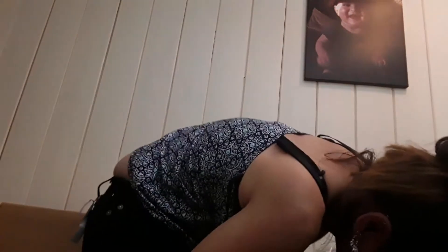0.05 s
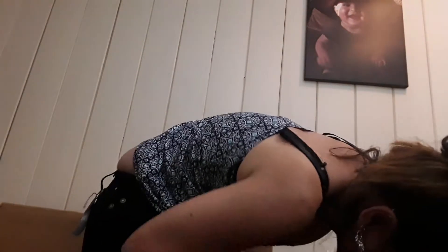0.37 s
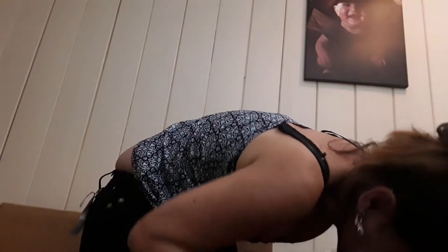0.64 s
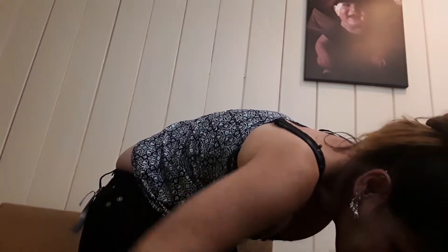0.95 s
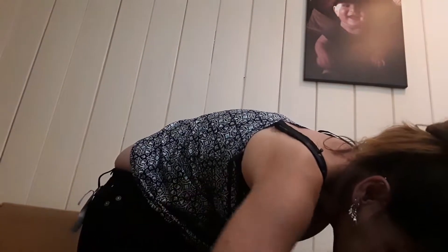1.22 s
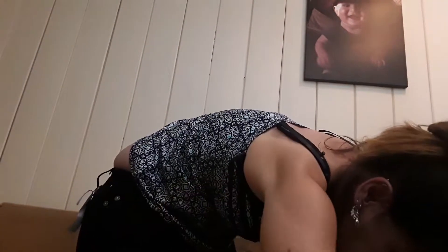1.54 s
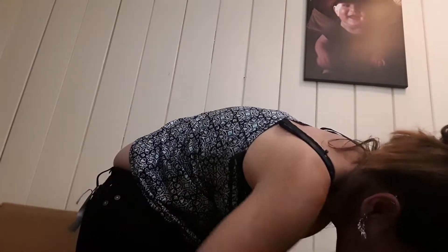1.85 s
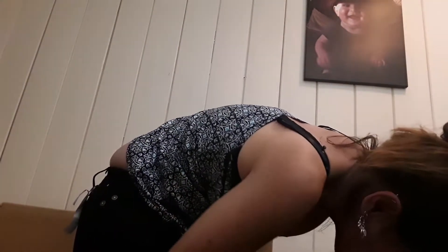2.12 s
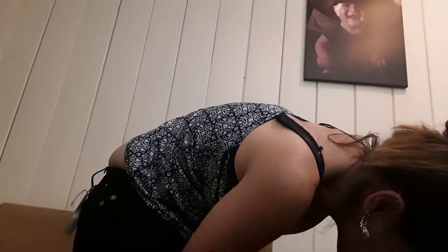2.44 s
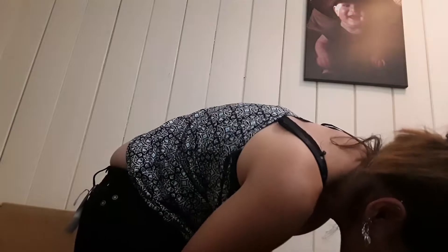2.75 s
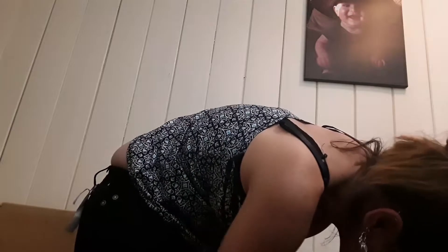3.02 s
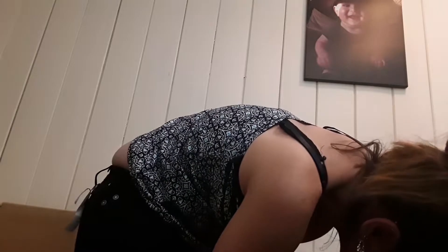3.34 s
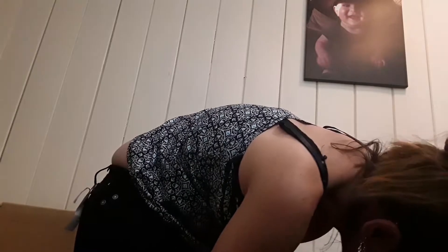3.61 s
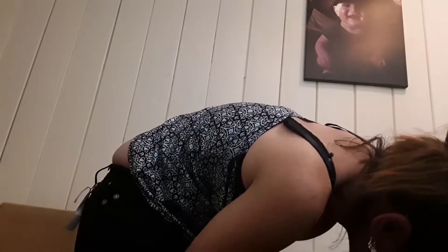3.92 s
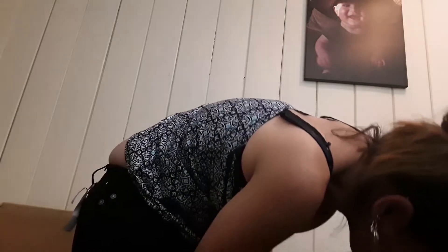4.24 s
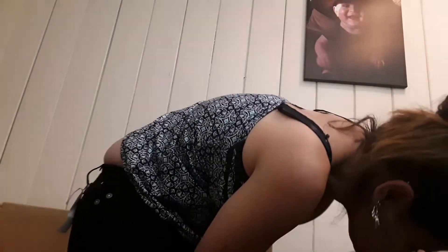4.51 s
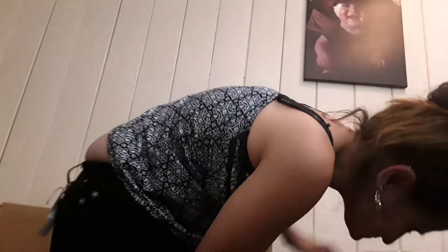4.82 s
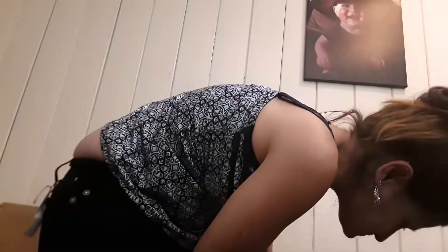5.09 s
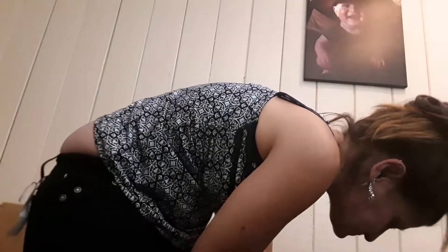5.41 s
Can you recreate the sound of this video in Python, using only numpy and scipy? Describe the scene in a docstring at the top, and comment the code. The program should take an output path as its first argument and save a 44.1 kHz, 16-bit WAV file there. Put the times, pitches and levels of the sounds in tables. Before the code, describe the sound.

Packing material crinkles and rustles inside a cardboard box, with sharp little snaps, light scraping and a few hollow bumps.

```python
"""A small panelled room: hands rummage through packing material in a cardboard box.
Creases buckle in showers of tiny clicks and some sharp snaps. The sheets rub on each other
and scrape along the cardboard, whose walls drone. The half-open box colours all of this
and rings when bumped now and then. Faint room noise lies underneath."""
import sys
import numpy as np
from scipy import signal
from scipy.fft import rfft, irfft, next_fast_len
from scipy.io import wavfile
from scipy.ndimage import uniform_filter1d

SR = 44100
rng = np.random.default_rng(int(sys.argv[2]) if len(sys.argv) > 2 else 0)


def wav_out(sig):
    """Save sig, one row per channel (or a flat mono array), as 16-bit PCM at SR to the path in sys.argv[1]."""
    wavfile.write(sys.argv[1], SR, np.round(np.clip(np.atleast_2d(sig).T, -1, 1) * 32767).astype(np.int16))


N = 249606
TIME = np.arange(N) / SR
FINE_T60_S = 0.006

# spectra of creases, finest creases and scraped cardboard: (frequency [Hz], relative density [dB])
CRINKLE = [(700, -39), (1300, -3), (2000, -4), (2600, -5), (3500, 0.3), (4500, 3.5), (5700, -2.5),
           (6700, 0), (8500, -9.5), (10500, -12.5), (15000, -55)]
CRISP = [(6000, -18), (8500, 5.5), (10000, -0.5), (12800, 4), (15000, -9.5), (16000, -23)]
SCRAPE = [(50, -21), (100, -15.5), (135, -9.5), (175, -6), (220, -3.5), (270, -4.5), (500, -3), (750, -2),
          (1200, 2.5), (1600, -6.5), (2400, -4), (5000, -27)]


def packing(crinkle_db, treble_db):
    """Creases buckle, the finest tick in the top treble, sliding sheets hiss underneath."""
    creases = crackle(crinkle_db, CRINKLE, 1760, 9100, peak_per_s=1500, spread_db=4.5, facets=20,
                      ring_db=11.5, width_oct=0.15, t60_s=0.01, near_db=-8.5, room_db=-21)
    fine = crackle(treble_db, CRISP, 6530, 15500, peak_per_s=900, spread_db=2.5, facets=8,
                   ring_db=16, width_oct=0.1, t60_s=FINE_T60_S, near_db=-30, room_db=-30)
    sliding = from_db(crinkle_db - 3.5) * noise(CRINKLE, N) + from_db(treble_db - 4.5) * noise(CRISP, N)
    return from_db(0.54) * creases + from_db(-0.1) * fine + sliding


def crackle(level_db, spectrum, low_hz, high_hz, peak_per_s, spread_db, facets, **facet_settings):
    """Random uneven clicks, dealt to facets of different pitch; harder handling makes more."""
    rate_per_s = peak_per_s * from_db(0.5 * (level_db - level_db.max()))
    sizes = from_db(spread_db * np.minimum(rng.exponential(1, N), 4)) * rng.choice([-1, 1], N)
    clicks = sizes * (rng.random(N) < rate_per_s / SR)
    # the hands set the power, however it is split among the clicks
    local_power = uniform_filter1d(uniform_filter1d(clicks ** 2, size=1500), size=1500)
    clicks = clicks / np.sqrt(np.abs(local_power) + 1e-4) * from_db(level_db)
    dealt_to = rng.integers(0, facets, N)
    out = np.zeros((2, N))
    for k, hz in enumerate(np.geomspace(low_hz, high_hz, facets)):
        response = facet(spectrum, hz, **facet_settings)
        out += signal.oaconvolve((clicks * (dealt_to == k))[None], response, axes=1)[:, :N]
    return out


def facet(spectrum, ring_hz, ring_db, width_oct, t60_s, near_db, room_db):
    """A patch of sheet flips: a brief ring, then duller reflections from box and room; energy 1."""
    buckle_s = 0.00079  # run along the crease, before the decay
    near_t60_s, room_t60_s, room_rise_s, dull_hz = 0.11, 0.23, 0.0068, 9150
    t = TIME[:10000]
    tone = noise(spectrum, len(t), ring_hz, ring_db, width_oct)
    flip = tone * from_db(-60 * np.maximum(t - buckle_s, 0) / t60_s)
    near = from_db(near_db - 60 * t / near_t60_s)
    room = from_db(room_db - 60 * t / room_t60_s) * (1 - np.exp(-t / room_rise_s))
    echoes = tone[:, ::-1] * np.hypot(near, room)  # same colour, unrelated waveform
    dull_echoes = signal.lfilter(*signal.butter(1, dull_hz, fs=SR), echoes)
    return rms_one(flip + dull_echoes) / np.sqrt(len(t))


def handling():
    """Crinkle, scrape and top treble levels [dB]; overlapping hand strokes add in power."""
    # (start [s], rise [s], hold [s], crinkle [dB], scrape [dB re crinkle], treble [dB re crinkle])
    strokes = [(0.0, 0.0013, 0.026, -38, -4.5, -9.5), (0.03, 0.047, 0.19, -45.5, -4.5, -10.5),
               (0.255, 0.014, 0.052, -43.5, -5.0, -10.5), (0.353, 0.054, 0.19, -54.5, -1, -9.5),
               (0.647, 0.03, 0.064, -53, -8.5, -21), (0.732, 0.044, 0.27, -49.5, -3.0, -3),
               (1.18, 0.015, 0.13, -70, -5.5, -16), (1.486, 0.068, 0.013, -29.0, -8.5, -10.0),
               (1.628, 0.015, 0.019, -41, -6.5, -9), (1.71, 0.036, 0.06, -50, -4.5, -10),
               (1.797, 0.029, 0.21, -36.5, -7.5, -5.5), (2.084, 0.056, 0.043, -47.5, -7.0, -12),
               (2.223, 0.061, 0.008, -47.5, -7, -9.5), (2.274, 0.047, 0.03, -39.0, -7.0, -7.5),
               (2.6, 0.049, 0.014, -42.5, -4.5, -15), (2.689, 0.0098, 0.0082, -45.0, -3, -14.0),
               (2.727, 0.014, 0.1, -49.0, -5, -10.5), (2.877, 0.032, 0.058, -46, -9, -11),
               (2.97, 0.035, 0.02, -43.5, -5.5, -9), (3.152, 0.1, 0.046, -45, -8, -14),
               (3.483, 0.031, 0.005, -44.5, -11.5, -12.5), (3.52, 0.025, 0.025, -33.5, -8.0, -5.5),
               (3.601, 0.018, 0.067, -37.5, -8.5, -4.5), (3.723, 0.057, 0.012, -40.5, -7, -4),
               (3.862, 0.033, 0.05, -45.5, -11, -5), (3.888, 0.041, 0.12, -43.0, -8.5, -7.5),
               (4.087, 0.035, 0.17, -55, -8, -10.0), (4.317, 0.023, 0.12, -50.5, -11.5, -11),
               (4.447, 0.0055, 0.036, -45, -4.5, -6), (4.482, 0.046, 0.1, -40, -5, -6.5),
               (4.645, 0.063, 0.03, -38, -6.0, -7), (4.751, 0.069, 0.1, -46, -5.5, -7.5),
               (4.968, 0.028, 0.22, -45, -7.5, -11), (5.118, 0.076, 0.2, -39, -7.5, -11),
               (5.387, 0.036, 0.18, -43.5, -6.0, -14), (5.55, 0.035, 0.083, -42.5, -8, -6)]
    # creep of the packing at rest: (crinkle [dB], scrape [dB], treble [dB])
    rest_db = (-70.5, -82, -83)
    power = from_db(rest_db)[:, None] ** 2
    for start_s, rise_s, hold_s, crinkle_db, scrape_db, treble_db in strokes:
        gain = stroke(start_s, rise_s, hold_s, crinkle_db)
        power = power + np.outer(from_db([0, scrape_db, treble_db]), gain) ** 2
    return 10 * np.log10(power)


def stroke(start_s, rise_s, hold_s, level_db):
    """Gain of one movement: builds up, holds, settles once the hands let go."""
    settle_db_per_s = 188
    grip = np.clip((TIME - start_s) / rise_s, 0, 1) ** 0.68
    released_s = np.maximum(TIME - start_s - rise_s - hold_s, 0)
    return grip * from_db(level_db - settle_db_per_s * released_s)


def snaps():
    """Stiff creases give way at once: a bright crack and a ring at the crease's own pitch."""
    # (time [s], energy [dB], ring [Hz], crack [dB re ring])
    stiff_creases = [(0.144, -14.5, 4300, -2), (0.2631, -8, 4830, -7.5), (0.2706, -14, 3830, -8),
                     (0.4048, -23, 4050, -23), (0.564, -13, 4300, -13.5), (0.5695, -17.5, 5360, -13),
                     (0.9831, -10, 4890, -11), (1.23, -24.5, 4860, -26), (1.2926, -26.5, 4450, -32),
                     (1.4898, -15, 4400, -24), (1.5556, -1, 4400, -14), (1.64, -9, 5070, -9),
                     (1.7972, -11.5, 4090, -10), (1.8145, -8.5, 4430, -4), (1.8283, -6.5, 4560, 0),
                     (1.873, -8, 6540, -10), (1.8885, -4, 4330, -13), (1.9892, -9, 4640, -2),
                     (2.0083, -13, 4880, -4), (2.0272, -4, 6150, -1), (2.1427, -14.5, 4350, -12.5),
                     (2.1653, -10.5, 4480, -13), (2.2298, -19, 6590, -10), (2.6299, -21, 1950, -21),
                     (2.6526, -6.5, 4380, -18), (2.8065, -17.5, 4940, -4), (2.892, -19.0, 5050, -23),
                     (2.968, -7, 4430, -9), (3.0281, -13.5, 4800, -3.5), (3.0766, -22.5, 4710, -22),
                     (3.1855, -19.5, 4870, -24), (3.2958, -13.5, 4630, -24), (3.3163, -17, 4710, -9),
                     (3.52, -8.5, 4420, -19), (3.54, -9.5, 2000, -13), (3.76, -12.5, 7770, -2),
                     (3.7828, -9, 3790, -7), (3.8572, -14.5, 4100, -9), (3.9263, -12.5, 5000, 1),
                     (3.933, -10.0, 4290, -3), (4.1493, -14.5, 6600, -21.5), (4.2752, -19.5, 6740, -21),
                     (4.3322, -14.5, 4560, -14), (4.4537, -9.5, 3600, -8), (4.487, -9, 6440, -17),
                     (4.5543, -8.5, 5100, -6), (4.6007, -8, 4570, -2), (4.729, -10.5, 6300, -7),
                     (4.7875, -11, 3570, -9), (4.8724, -14.5, 6550, -9.5), (5.1519, -10.5, 4870, -14),
                     (5.2277, -5.5, 6450, -14), (5.3223, -8.0, 4240, -7.5)]
    # (frequency [Hz], relative density [dB])
    spectrum = [(100, -34), (400, -18), (900, 0), (2000, -4), (4500, 4), (8000, 2.5), (11000, -15),
                (15000, -19)]
    out = np.zeros((2, N))
    for time_s, energy_db, hz, crack_db in stiff_creases:
        ring = facet(spectrum, hz, ring_db=8.5, width_oct=0.15, t60_s=0.023, near_db=-8.5, room_db=-19)
        crack = facet(CRISP, 9260, ring_db=7.5, width_oct=0.05, t60_s=FINE_T60_S,
                      near_db=-14, room_db=-23)
        pan_db = rng.normal(-2.5, 0.5)  # left minus right
        gains = from_db(energy_db + np.array([[pan_db], [-pan_db]]) / 2)
        add(out, (ring + from_db(crack_db) * crack) * gains, time_s)
    return out


def cardboard(level_db):
    """The load catches and slips along the box walls and makes them drone."""
    # wall drone: (frequency [Hz], relative density [dB])
    drone_spectrum = [(60, -22), (130, -1.5), (170, -5.5), (220, -0.5), (430, -4.5), (600, -4), (800, -21),
                      (1600, -19.5)]
    # hard drag after the big bump: (start [s], rise [s], hold [s], level [dB])
    drag = (.785, .03, .075, -44.5)
    catches = crackle(level_db, SCRAPE, 556, 1524, peak_per_s=700, spread_db=4, facets=12,
                      ring_db=11, width_oct=0.081, t60_s=0.049, near_db=-14.5, room_db=-15)
    drone = np.hypot(from_db(level_db - 7.5), stroke(*drag)) * noise(drone_spectrum, N)
    slipping = from_db(level_db - 3.5) * noise(SCRAPE, N)
    return from_db(0.07) * catches + slipping + drone


def bumps():
    """Soft blows set the hollow box ringing; the room answers."""
    # (time [s], level [dB])
    blows = [(0.003, -41), (0.313, -38.5), (0.33, -36), (0.757, -24), (0.812, -42), (1.053, -47),
             (1.888, -44), (4.585, -42), (5.22, -45)]
    # (frequency [Hz], level [dB], t60 [s])
    box_modes = [(69, -13, 0.06), (137, -22, 0.2), (219, -4.5, 0.13), (224, -12, 0.42), (313, -16.5, 0.23),
                 (441, -9, 0.087), (676, -29.5, 0.11), (790, -21, 0.13)]
    attack_s, tail_t60_s = 0.0021, 0.5
    t, out = TIME[:SR // 2], np.zeros((2, N))
    attack = 1 - np.exp(-t / attack_s)
    pan = from_db([[-1.3], [1.3]])
    for time_s, level_db in blows:
        ring = sum(from_db(db + rng.normal(0, 1) - 60 * t / t60_s) * np.sin(2 * np.pi * hz * t)
                   for hz, db, t60_s in box_modes)
        room = noise(SCRAPE, len(t), ring_hz=226, ring_db=43, width_oct=0.36)
        room *= from_db(-16 - 60 * t / tail_t60_s)
        add(out, (ring * pan + room) * attack * from_db(level_db - 1.5), time_s)
    return out


def rubs():
    """A sheet slides gently; one resonance stands out as a narrow, hollow tone."""
    # (start [s], rise [s], hold [s], level [dB], resonance [Hz])
    slides = [(.503, .01, 0.033, -53, 880), (2.386, 0.048, .19, -53.5, 2540), (3.08, .02, .1, -60, 880)]
    return sum(stroke(*movement) * noise(CRINKLE[1:], N, hz, ring_db=14.5, width_oct=0.12)
               for *movement, hz in slides)


def inside_box(x):
    """Air and wall resonances of the half-open box colour what is handled in it."""
    # (frequency [Hz], width [Hz], gain [dB])
    resonances = [(217.7, 18, 5), (310, 24, 6), (427, 20, 6), (585, 32, 4), (665, 40, 3.5), (793, 43, 6),
                  (930, 33, 1.5), (1173, 49, -3), (1927, 110, 5.5)]
    return x + sum((from_db(db) - 1) * signal.lfilter(*signal.iirpeak(hz, hz / width_hz, fs=SR), x)
                   for hz, width_hz, db in resonances)


def room_noise():
    """Faint, steady, bass-heavy background."""
    # (frequency [Hz], relative density [dB])
    spectrum = [(25, -18), (50, -19), (80, 3), (115, 7), (170, -5), (300, -12), (800, -7), (2000, -14),
                (6000, -12), (15000, -23)]
    return from_db(-69.5) * noise(spectrum, N)


def noise(spectrum, size, ring_hz=1000, ring_db=0, width_oct=0.26):
    """Coloured stereo noise, optional resonance; alike in the low mids, diffuse in the treble; rms 1."""
    # (frequency [Hz], left-right correlation before clipping [-])
    likeness = [(50, 0.2), (160, 1.14), (350, .97), (700, 1.2), (1300, 0.45), (2500, 0.09), (5000, -0.0061),
                (12000, 0)]
    # (frequency [Hz], left minus right [dB])
    balance = [(60, -0.5), (200, -2), (700, -5), (1400, -0.5), (2800, -1.5), (5000, 1.5), (8000, -2),
               (13000, -5.5)]
    fft_size = next_fast_len(size, real=True)
    hz = np.maximum(np.fft.rfftfreq(fft_size, 1 / SR), 1)
    alike = np.clip(at_hz(likeness, hz), -1, 1)
    mid, side = rfft(rng.standard_normal((2, fft_size)))
    signs = np.array([[1], [-1]])
    pair = np.sqrt(1 + alike) * mid + np.sqrt(1 - alike) * side * signs
    resonance_db = ring_db * np.exp(-0.5 * (np.log2(hz / ring_hz) / width_oct) ** 2)
    colour = from_db(at_hz(spectrum, hz) + resonance_db + signs * at_hz(balance, hz) / 2)
    return rms_one(irfft(pair * colour, fft_size)[:, :size])


def from_db(db):
    """Decibels to gain."""
    return 10 ** (np.asarray(db) / 20)


def rms_one(x):
    """Scale to rms 1."""
    return x / np.sqrt(np.mean(x ** 2) + 1e-20)


def at_hz(points, hz):
    """Interpolate on a log-frequency axis."""
    known_hz, values = np.transpose(points)
    return np.interp(np.log(hz), np.log(known_hz), values)


def add(out, sound, time_s):
    """Mix a stereo sound in at time_s."""
    start = max(0, round(time_s * SR))
    out[:, start:start + sound.shape[1]] += sound[:, :N - start]


def scene():
    """Packing, box and the quiet room."""
    left_lag_s = 0.00009  # box slightly to the right
    crinkle_db, scrape_db, treble_db = handling()
    rummaging = packing(crinkle_db, treble_db) + cardboard(scrape_db) + rubs() + snaps()
    left, right = inside_box(rummaging) + bumps()
    left = np.pad(left, (round(left_lag_s * SR), 0))[:N]
    return np.array([left, right]) + room_noise()


def record(dry):
    """The microphone thins the deep bass; the top is cut."""
    low_hz, high_hz = 58, 15600
    thin = signal.sosfilt(signal.butter(3, low_hz, "high", fs=SR, output="sos"), dry)
    return signal.sosfilt(signal.ellip(10, 0.2, 80, high_hz, fs=SR, output="sos"), thin)


dry = scene()
out = record(dry)
wav_out(out)
```